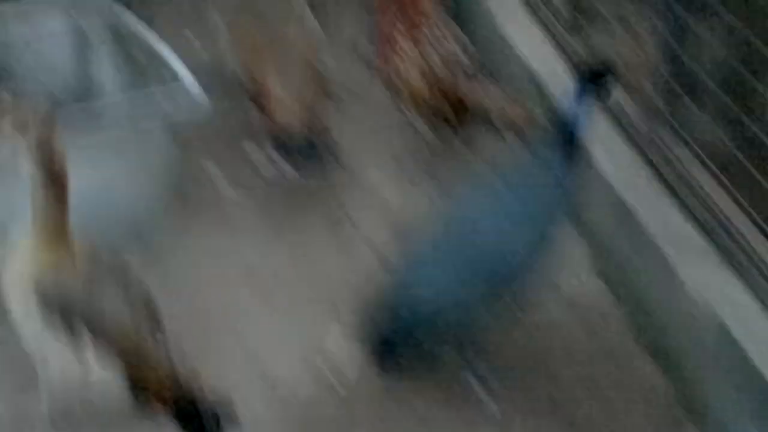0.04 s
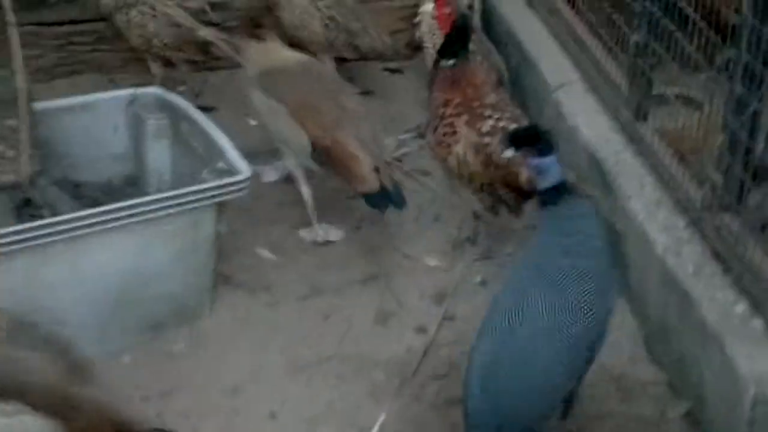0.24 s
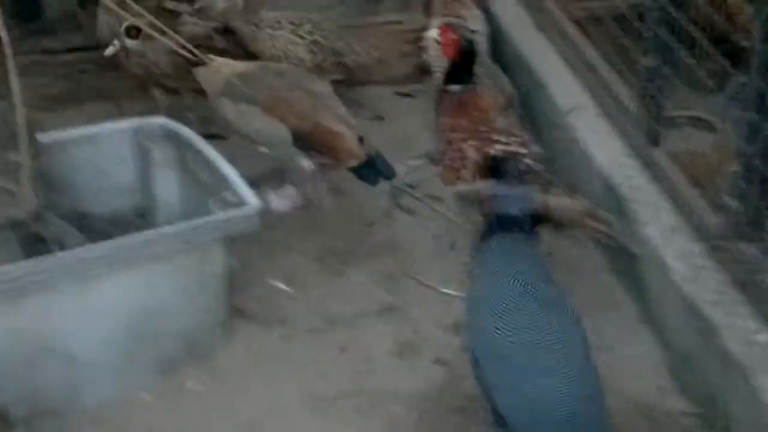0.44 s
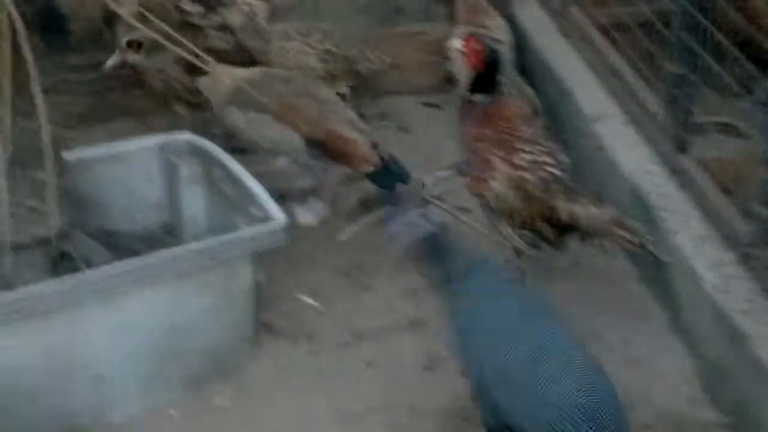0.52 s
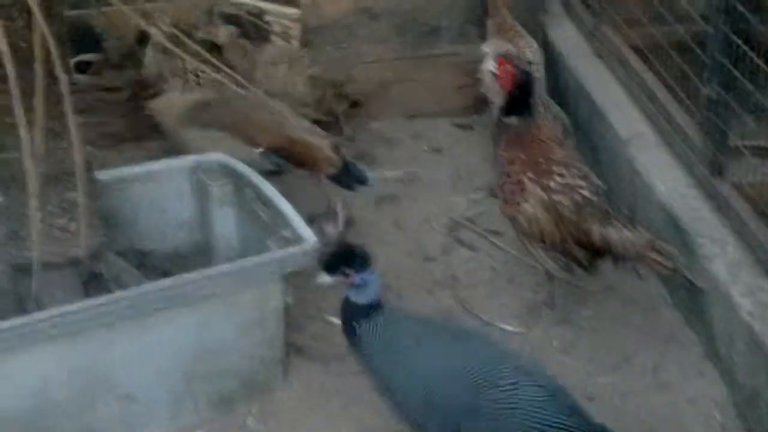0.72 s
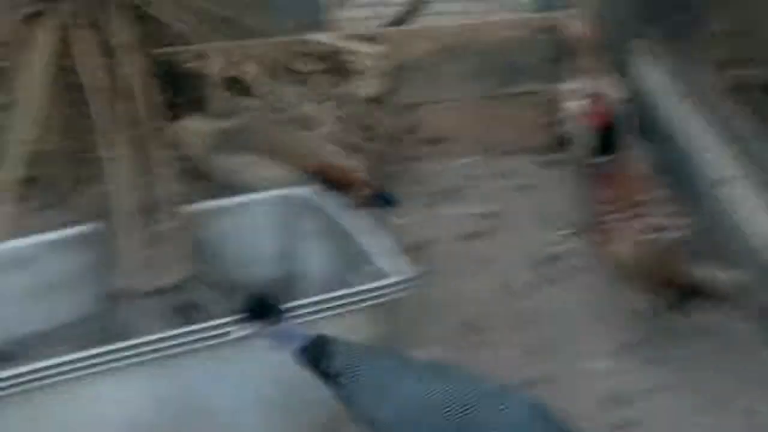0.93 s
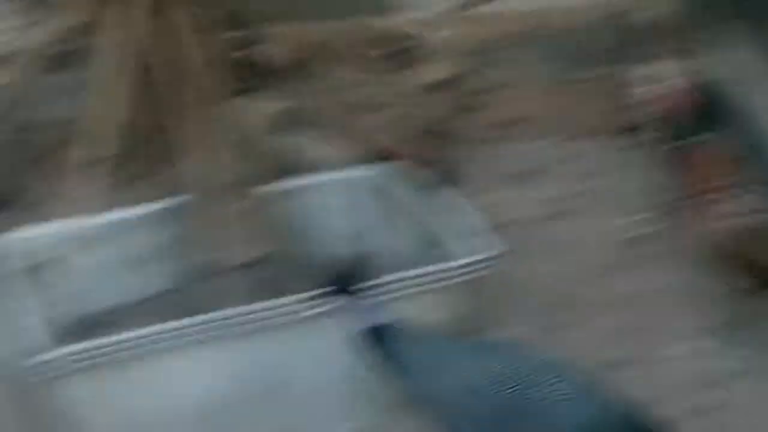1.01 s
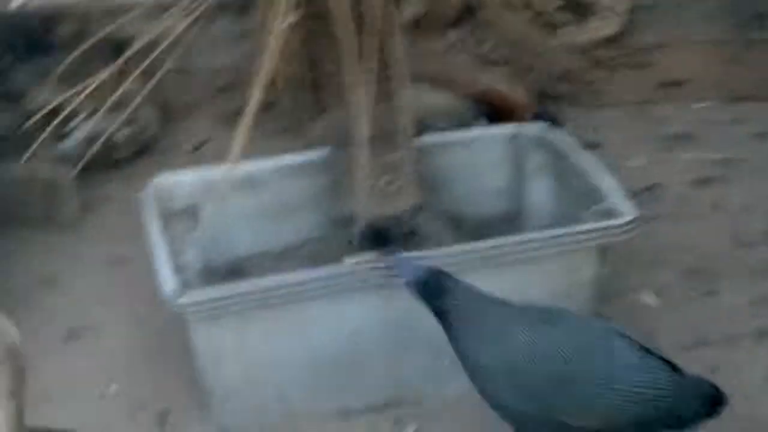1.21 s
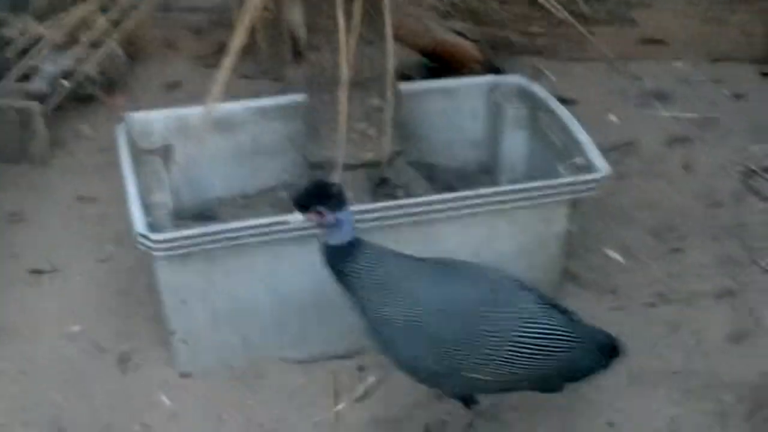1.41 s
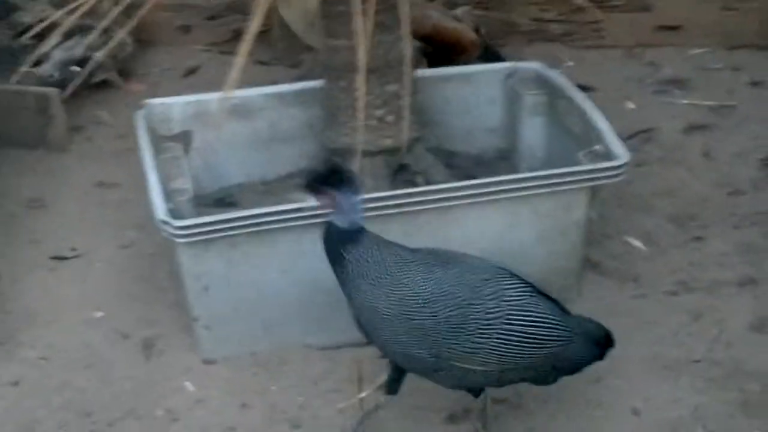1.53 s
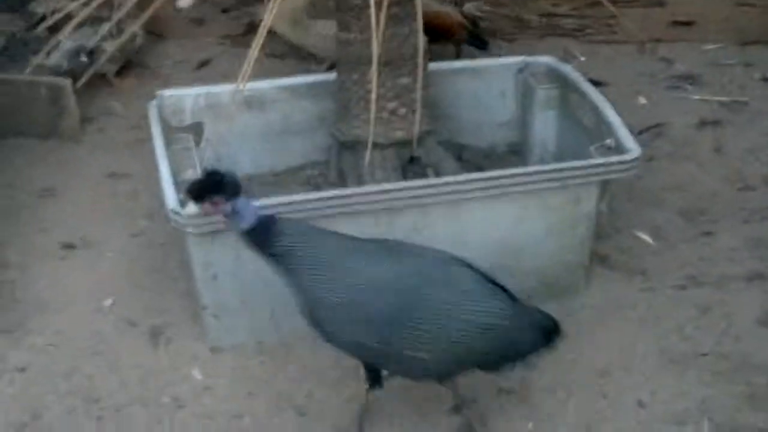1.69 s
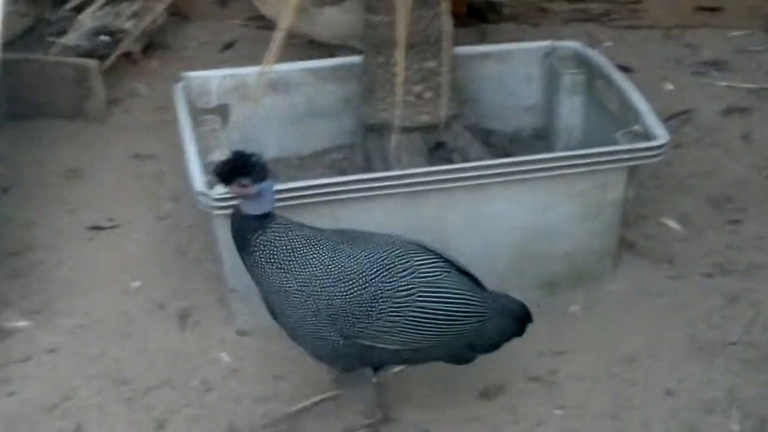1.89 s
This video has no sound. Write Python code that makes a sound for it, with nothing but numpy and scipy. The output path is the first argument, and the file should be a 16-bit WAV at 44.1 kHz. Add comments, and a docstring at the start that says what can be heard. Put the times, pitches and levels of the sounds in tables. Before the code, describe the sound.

Loud raspy guinea fowl squawks, four in about two seconds, with faint clucks and handling rumble

```python
"""A guinea fowl ends one squawk and gives four more, close to the right of a hand-held camera in a walled pen.
Its shrill, trilling voice near 2 kHz is a stack of partials (pure tones); those of half the pitch roughen it.
Thin whistles join in. A second fowl rasps from unsteady partials and breath noise; others cluck softly in
short arching notes. A low coo sounds far off and a beak taps the wire once. Shaped noise makes the wind and
handling rumble, the knocks and the soft hiss; a fading burst of noise gives the pen's short ring."""
import sys
import numpy as np
from scipy import signal
from scipy.fft import rfft, irfft, next_fast_len
from scipy.io import wavfile
from scipy.ndimage import map_coordinates

SR = 44100
rng = np.random.default_rng(int(sys.argv[2]) if len(sys.argv) > 2 else 0)


def transcribe(signal):
    """Save signal, clipped to [-1, 1], as a 16-bit WAV file at the path in sys.argv[1]."""
    frames = np.atleast_2d(signal).T
    limited = np.clip(frames, -1, 1)
    pcm = np.round(limited * 32767).astype(np.int16)
    wavfile.write(sys.argv[1], SR, pcm)


def invert_db(x):
    """Field ratio 10**(x/20) for x, a level in decibels (scalar or array-like)."""
    u = np.asarray(x, float) / 20
    return 10 ** u


N = 85995  # length in samples


def unit(x):
    """Scale a sound to an average strength (rms) of 1."""
    return x / np.sqrt(np.mean(x ** 2) + 1e-20)


def along(points, hz):
    """Read a table of frequency points at any frequency, on a nearly logarithmic axis."""
    f, value = np.transpose(points)
    return np.interp(np.log(hz + 1), np.log(f + 1), value)


def curves(rows):
    """Join the points of each column after the time into a curve with one value per sample."""
    seconds, *columns = np.transpose(rows)
    return [np.interp(np.arange(N) / SR, seconds, column) for column in columns]


def wobble(rate_hz):
    """A smooth random curve through rate_hz fresh random points a second."""
    points = rng.standard_normal(int(N * 2000 / SR) + 4)
    return map_coordinates(points, [np.arange(N) * min(rate_hz, 1999) / SR])


def noise(spectrum):
    """Noise of rms 1 whose frequencies are as strong as the table says."""
    m = next_fast_len(N)
    white = rfft(rng.standard_normal(m))
    coloured = irfft(white * invert_db(along(spectrum, np.fft.rfftfreq(m, 1 / SR))), m)
    return unit(coloured[:N])


def stack(pitch, tone, count, odd_gain=1):
    """Partials at whole multiples of a pitch, each as strong as the tone table says at its present frequency."""
    turn = 2 * np.pi * np.cumsum(pitch) / SR
    total = np.zeros(N)
    for k in range(1, count + 1):
        gain = (odd_gain if k % 2 else 1) * invert_db(along(tone, k * pitch))
        total += gain * np.sin(k * turn + k * k)  # k * k spreads the starting phases
    return total


def notes(rows, edge_s):
    """Loudness, pitch and position (-1 to 1) within each note; notes fade in and out over edge_s."""
    t, loudness, at = np.arange(N) / SR, np.zeros(N), np.zeros(N)
    hz = np.full(N, float(rows[0][3]))
    for start, length, db, pitch in rows:
        inside = (t > start) & (t < start + length)
        from_edge = np.minimum(t - start, start + length - t)
        loudness += invert_db(db) * np.sin(np.pi / 2 * np.clip(from_edge / edge_s, 0, 1)) ** 2
        hz = np.where(inside, pitch, hz)
        at = np.where(inside, 2 * (t - start) / length - 1, at)
    return loudness, hz, at


def squawker():
    """A trilling, jittering voice: partials of half the heard pitch, strongest near the fourth, plus breath."""
    # One list a squawk. Each row: time in seconds, level in dB before trill and placing, middle frequency of
    # the fourth partial in Hz, gain of the odd (half-pitch) partials in dB, breath in dB, trill depth 0 to 1.
    squawks = [
        [(0, -23, 4796, -9, -16, 0.2), (.04, -45.5, 4654, -17, 12, 0), (.09, -90, 4503, -20, 17, 0.2)],
        [(.16, -55.5, 3847, 6, 14.5, 1), (.196, -45, 3982, -20, 16, 0.88), (.203, -28.5, 4338, -15, 5.5, 0.92),
         (.26, -20, 4508, -43, -41, 0.59), (.31, -19.5, 4318, -21, -41, 0.56),
         (.345, -21.5, 4191, -26, -11, 0.65), (.38, -36, 4101, -29.5, 6, 0.4), (.43, -77, 4100, -20, -18, 0.2)],
        [(.53, -55, 4213, -18, 5.5, 0.6), (.541, -31.5, 4548, -16.5, -4, 0.7),
         (.595, -20, 4493, -58, -29.5, 0.67), (.65, -22, 4246, -22, -2, 0.33),
         (.715, -21, 4178, -4.5, -4.5, 0.2), (.755, -32.5, 4043, -30, 8, 0.18),
         (.81, -30, 4157, -16.5, 2, 0.42), (.84, -66, 4006, -39, -17, 0.86)],
        [(.992, -52, 4184, -15, 30, 0.39), (.998, -23.5, 4347, -11.5, -2, 0.46),
         (1.03, -17.5, 4265, -21, -39.5, 0.61), (1.11, -17.5, 4174, -5.5, -36, 0.18),
         (1.135, -20, 3790, -13, -6, 0.07), (1.2, -50.5, 3785, -24.5, -12, 0.15),
         (1.24, -49, 3863, -28, 8, 0.4)],
        [(1.482, -42.5, 4200, -18.5, 19, 0.29), (1.495, -21, 4285, -20, -9.5, 0.65),
         (1.53, -18.5, 4290, -17.5, -62, 0.5), (1.61, -18.5, 4101, -7, -41.5, 0.48),
         (1.635, -20.5, 3803, -42, -7.5, 0.07), (1.69, -43, 3777, -27, 1, 0.2),
         (1.75, -78, 3750, -12, 13, 0.31)],
    ]
    # How the beak and throat colour the voice. Each row: frequency in Hz, strength in dB.
    beak = [(900, -37.5), (1900, -20.5), (2300, -10.5), (3150, -6), (3800, 0.5), (4350, 5), (4800, -2),
            (5300, -6.5), (6300, -6), (8400, -18.5), (10500, -25), (12600, -39.5), (14200, -38),
            (16500, -62)]
    trill_hz, trill_depth, trill_db = 79, 0.09, 6  # beats a second; pitch share and swell at full depth
    jitter, shimmer_db = .007, 3  # random unsteadiness of pitch (share) and level

    rows = []
    for call in squawks:  # hushed rows 10 ms outside keep the squawks apart
        first, last = call[0], call[-1]
        rows.append((first[0] - .01, -90, *first[2:]))
        rows.extend(call)
        rows.append((last[0] + .01, -90, *last[2:]))
    db, top, odd_db, breath_db, depth = curves(rows)

    beat = 2 * np.pi * np.cumsum(trill_hz * (1 + 0.072 * wobble(25))) / SR
    # the trill starts a fresh beat at the second row of each squawk
    starts = np.array([round(call[1][0] * SR) for call in squawks])
    latest = np.maximum(np.searchsorted(starts, np.arange(N)) - 1, 0)
    beat = beat - beat[starts][latest] + np.pi
    depth = np.clip(depth, 0, 1)
    sweep = np.sin(beat) - 0.52 * np.sin(2 * beat)
    half_pitch = top / 4 * (1 + trill_depth * depth * sweep + jitter * wobble(300))
    tones = unit(stack(half_pitch, beak, count=15, odd_gain=invert_db(odd_db)))
    voice = tones + invert_db(breath_db) * noise(beak)
    swell_db = trill_db * depth * np.cos(beat + .5)
    return invert_db(db + swell_db + shimmer_db * wobble(250)) * voice


def dipped(x):
    """Three fixed dips weaken narrow bands of the squawker's voice, near 2.7, 5.2 and 12.5 kHz."""
    # Each row: middle frequency in Hz, width in Hz, depth in dB.
    dips = [(2680, 170, -14), (5150, 200, -7), (12500, 500, -18)]
    hz = np.fft.rfftfreq(N, 1 / SR)
    gain_db = sum(db * np.exp(-((hz - middle) / width) ** 2) for middle, width, db in dips)
    return irfft(rfft(x) * invert_db(gain_db), N)


def whistler(rows, jitter, overtone_db):
    """Thin, slightly rough notes: a gliding tone with one overtone at twice its frequency."""
    db, hz = curves(rows)
    turn = 2 * np.pi * np.cumsum(hz * (1 + jitter * wobble(300))) / SR
    sounding = np.arange(N) / SR < rows[-1][0]
    tone = np.sin(turn) + invert_db(overtone_db) * np.sin(2 * turn)
    return sounding * invert_db(db + 3.07 * wobble(119)) * tone


def rasper():
    """Hoarse rasps: very unsteady, falling partials and breath noise coloured by one throat."""
    # Each row: start in seconds, length in seconds, level in dB before flutter and placing, middle pitch in Hz.
    rasps = [(-.05, 0.13, -42, 1162), (.065, 0.029, -31.5, 952), (.40, 0.068, -43, 993),
             (.605, 0.21, -47.5, 1062), (.81, 0.075, -39.5, 1006), (1.13, 0.081, -46, 1019),
             (1.36, 0.047, -42, 1043), (1.63, 0.082, -45.5, 1024), (1.86, 0.046, -39, 1059)]
    # How the throat colours tones and breath. Each row: frequency in Hz, strength in dB.
    throat = [(900, -40), (1300, -15), (2150, -7), (2650, -10), (3150, -2), (3650, -8), (4200, 0),
              (4700, -12), (5200, -12), (6200, -15), (7500, -19), (12000, -48), (15000, -80)]
    jitter, breath_db, flutter_db = .03, 1, 2  # pitch unsteadiness (share), breath, level unsteadiness
    loudness, hz, at = notes(rasps, edge_s=.028)
    pitch = hz * (1 - 0.0409 * at + jitter * wobble(350))
    voice = unit(stack(pitch, throat, count=11)) + invert_db(breath_db) * noise(throat)
    return loudness * invert_db(flutter_db * wobble(200)) * voice


def cluckers():
    """Short clear notes of partials whose pitch rises and falls in an arch."""
    # Each row: start in seconds, length in seconds, level in dB before placing, pitch in Hz at the arch's top.
    clucks = [(.145, 0.055, -46.5, 545.3), (.43, 0.05, -47.5, 586), (.70, 0.056, -54, 538.5),
              (.79, .05, -47, 387.4), (.99, 0.048, -46, 562.7), (1.16, 0.051, -40, 1210),
              (1.53, 0.057, -43, 1190)]
    # Colour of the clucks. Each row: frequency in Hz, strength in dB.
    cluck_tone = [(380, -14), (540, 0), (800, -1), (1150, -3), (1800, -10), (2400, -10), (5000, -18),
                  (7000, -40)]
    arch = 0.09  # share by which the pitch sags at both ends
    loudness, hz, at = notes(clucks, edge_s=0.0093)
    pitch = hz * (1 - arch * at ** 2 + 0.027 * wobble(200))
    return loudness * unit(stack(pitch, cluck_tone, count=10))


def tick():
    """A beak taps the wire: one burst of bright noise that dies away fast."""
    start_s, level_db, t60_s = .082, -42, .05  # t60: time to fall by 60 dB
    after = np.arange(N) / SR - start_s
    bright = unit(np.diff(rng.standard_normal(N + 1)))
    return (after > 0) * invert_db(level_db - 60 * np.abs(after) / t60_s) * bright


def rumble():
    """Wind and handling as lumpy low noise, with dull knocks through the camera body, mostly on the right."""
    # Buffeting. Each row: time in seconds, level in dB before the unsteadiness and channel gains.
    buffeting = [(0.0, -44), (0.114, -44.5), (0.156, -32), (0.346, -67), (0.444, -50), (0.548, -57),
                 (0.754, -55), (0.83, -44), (0.89, -65.5), (0.95, -54), (1.102, -56.5), (1.45, -57),
                 (1.466, -44.5), (1.666, -65), (1.95, -51.5)]
    # Colour of the buffeting. Each row: frequency in Hz, strength in dB.
    rumble_tone = [(22, 5), (99, 6), (256, -14.5), (408, -16), (531, -16), (900, -22.5), (1170, -62),
                   (1980, -120)]
    # Each row: start of a knock in seconds, relative level in dB.
    knocks = [(0.082, -33), (0.143, -31), (0.253, -35.5), (0.327, -46.5), (0.709, -38.5), (0.772, -62),
              (0.826, -38.5), (1.019, -35), (1.477, -45), (1.728, -43)]
    # Colour of the knocks. Each row: frequency in Hz, strength in dB.
    knock_tone = [(30, 0), (100, -6), (300, -9.5), (1000, -16), (3000, -17), (8000, -85)]
    rise_s, knock_db = 0.0094, -4.5  # time from a knock's start to its peak; gain of all knocks

    db, = curves(buffeting)
    bumps = np.zeros(N)
    for start, level in knocks:
        after = np.maximum(np.arange(N) / SR - start, 0) / rise_s
        bumps += invert_db(level + knock_db) * after * np.exp(-after)
    shared = invert_db(db + 4.8 * wobble(16.52)) * noise(rumble_tone) + bumps * noise(knock_tone)
    separate = invert_db(db) * np.array([noise(rumble_tone), noise(rumble_tone)])
    return invert_db([[-11], [4]]) * shared + invert_db([[-17], [-14]]) * separate


def air():
    """Distant birds and yard as one soft hiss: shaped noise, separate on each side, swelling unevenly."""
    # Each row: frequency in Hz, strength in dB.
    air_tone = [(150, -40), (250, -12.5), (580, -18), (870, -20.5), (1100, -26), (1500, -16), (1900, -13.5),
                (2700, -22.5), (3900, -28), (4900, -24.5), (5700, -36), (12000, -98.5)]
    level_db = -60 + np.array([[-3], [3]])  # left, right
    swell_db = 3 * wobble(12.65)
    return invert_db(level_db + swell_db) * np.array([noise(air_tone), noise(air_tone)])


def placed(x, left_db, right_db, wet_left_db, wet_right_db, lead_s=0.00016):
    """Direct sound, reaching the left lead_s before the right, plus the pen's dense, short ring (wet)."""
    # How long the pen rings. Each row: frequency in Hz, time in seconds to fall by 60 dB.
    pen = [(500, 0.033), (2000, 0.25), (4200, 0.22), (8000, 0.17), (14000, 0.18)]
    hz, t, z = signal.stft(rng.standard_normal((2, SR // 2)), SR, nperseg=128)
    fade = invert_db(-60 * t / np.maximum(along(pen, hz), .02)[:, None])
    tail = signal.istft(z * fade, SR, nperseg=128)[1]
    wet = signal.fftconvolve(x[None], tail / np.linalg.norm(tail[0]), axes=1)[:, :N]
    wet = np.pad(wet, ((0, 0), (90, 0)))[:, :N]  # the ring starts 90 samples (2 ms) later
    late = irfft(rfft(x) * np.exp(-2j * np.pi * np.fft.rfftfreq(N, 1 / SR) * lead_s), N)
    direct = np.array([x, late])
    return invert_db([[left_db], [right_db]]) * direct + invert_db([[wet_left_db], [wet_right_db]]) * wet


def scene():
    """Place every bird in the pen and add the tap, rumble and hiss."""
    # Thin notes from the other side of the squawker's voice box.
    # Each row: time in seconds, level in dB before flicker and placing, middle frequency in Hz.
    whistle = [(.16, -72, 3700), (.163, -22, 3564), (.172, -52, 3836), (.185, -47, 3394),
               (.189, -17.5, 3184), (.197, -58, 3565), (.201, -12, 3620), (.21, -68, 3970),
               (.345, -60, 3150), (.351, -24, 3366), (.362, -28, 3750), (.395, -67, 3260),
               (.533, -54, 3730), (.538, -20, 3633), (.555, -73, 3720), (.70, -50, 4007),
               (.72, -15.5, 3790), (.745, -37, 3290), (.785, -24.5, 3054), (.828, -29, 2967),
               (.86, -65, 2899)]
    # A low, unsteady coo far off. Each row: the same columns as the whistle.
    coo = [(1.66, -67, 640), (1.735, -54, 549), (1.77, -62, 615), (1.80, -52, 606.6), (1.84, -66.5, 528)]
    # Gains for clucks and coo, in dB: direct left, direct right, ring left, ring right.
    cluck_place = -4, 2, -12, -8

    mix = placed(dipped(squawker()), -18, 2.37, -7.5, 1.58)
    mix += placed(whistler(whistle, jitter=0.016, overtone_db=-15.5), -22, 0.75, -17, -3.5)
    mix += placed(rasper(), 0.41, 4.7, 1.4, 4.64)
    mix += placed(cluckers(), *cluck_place, lead_s=0.00044)
    mix += placed(whistler(coo, jitter=0.0689, overtone_db=-30.5), *cluck_place)
    mix += invert_db([[-8], [0]]) * tick()
    return mix + rumble() + air()


def roll_off(x):
    """The treble ends steeply here."""
    return signal.sosfilt(signal.butter(12, 15660, fs=SR, output="sos"), x)


def record(dry):
    """Pass the finished mix through the camera."""
    return roll_off(dry)


dry = scene()
out = record(dry)
transcribe(out)
```